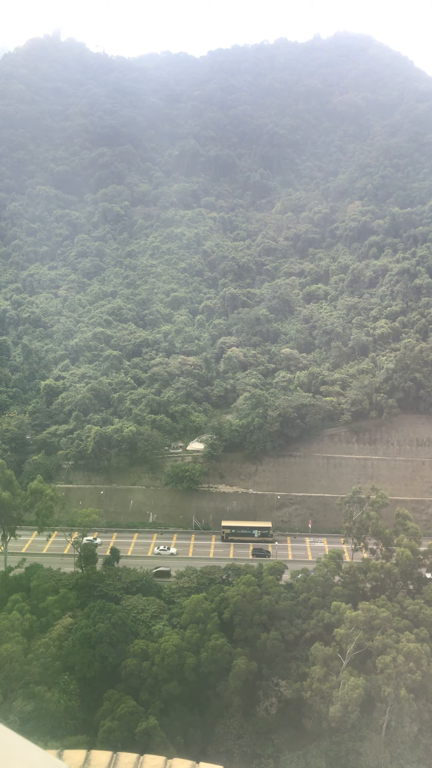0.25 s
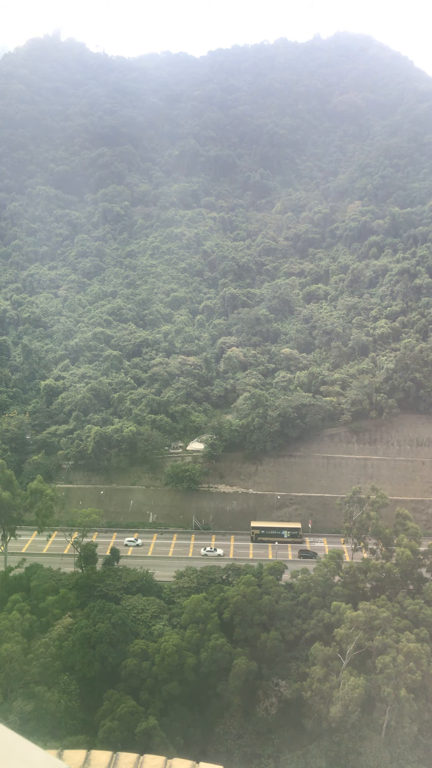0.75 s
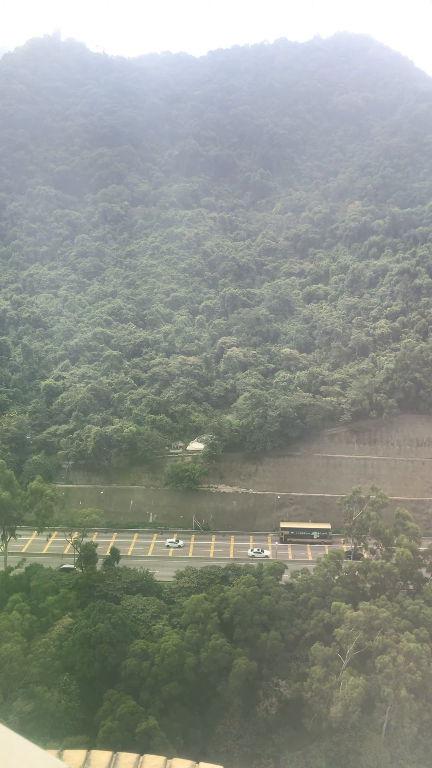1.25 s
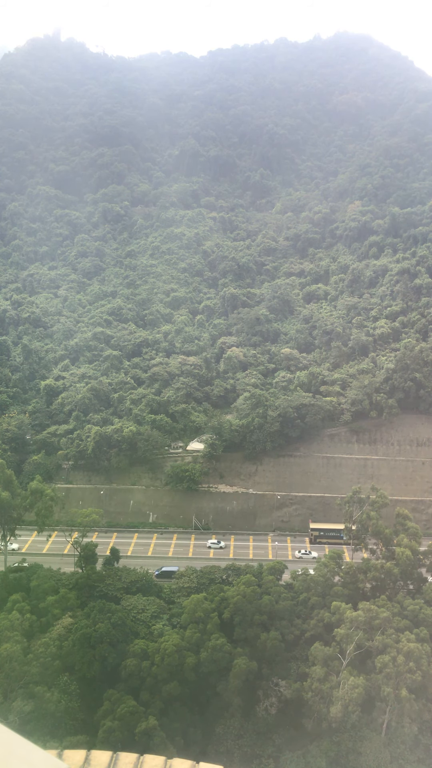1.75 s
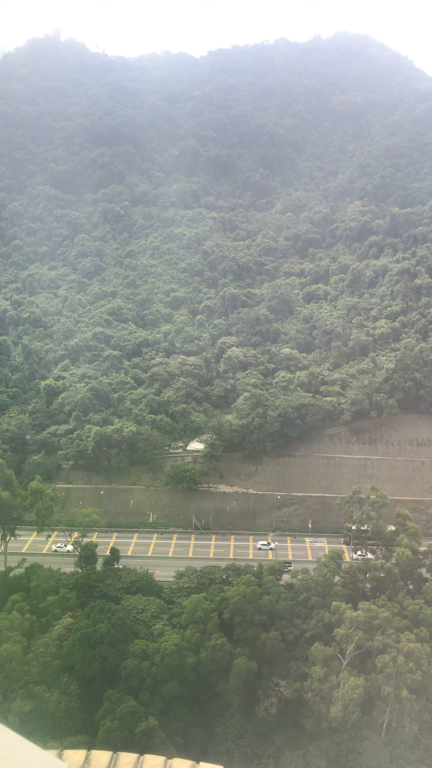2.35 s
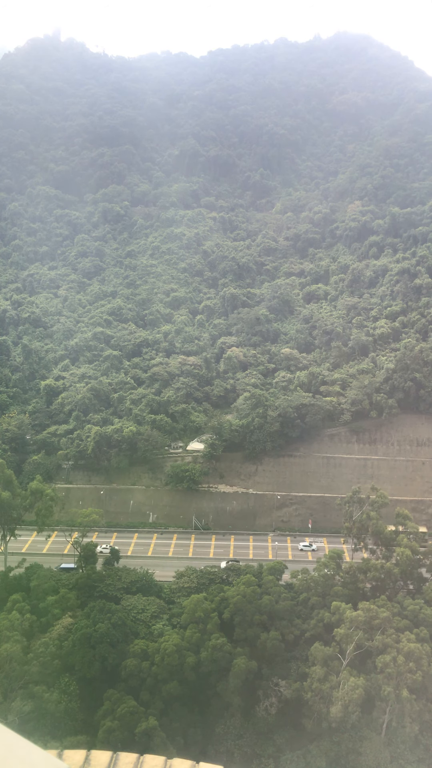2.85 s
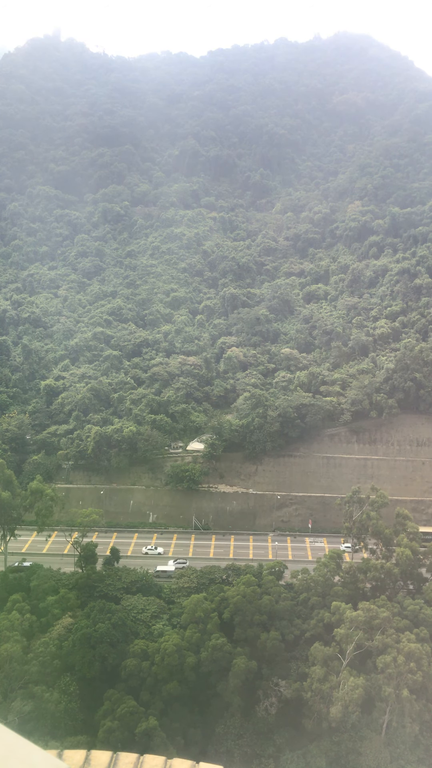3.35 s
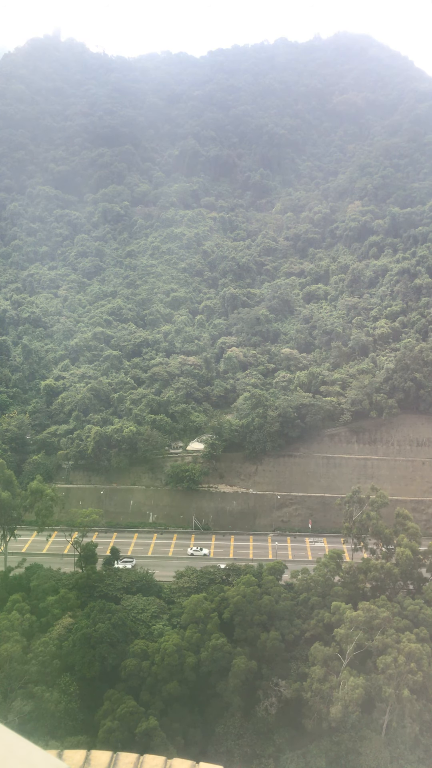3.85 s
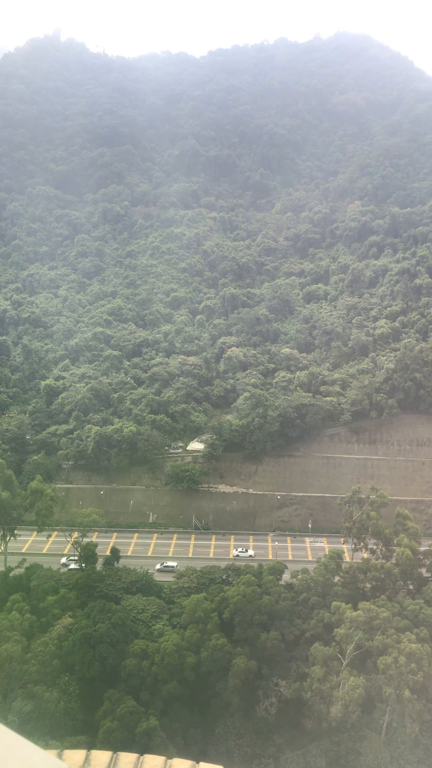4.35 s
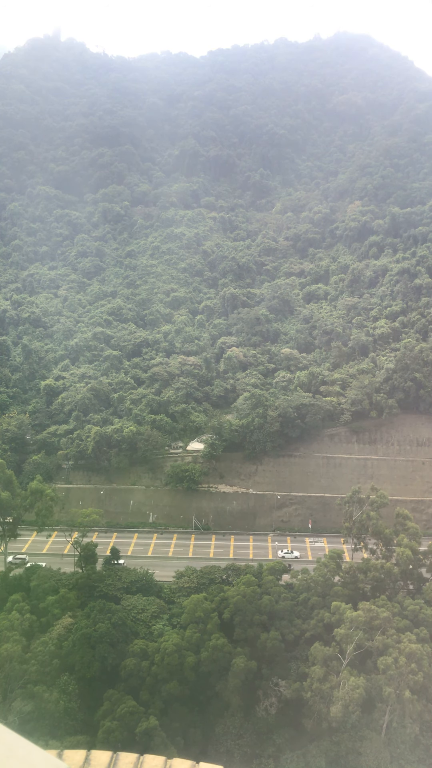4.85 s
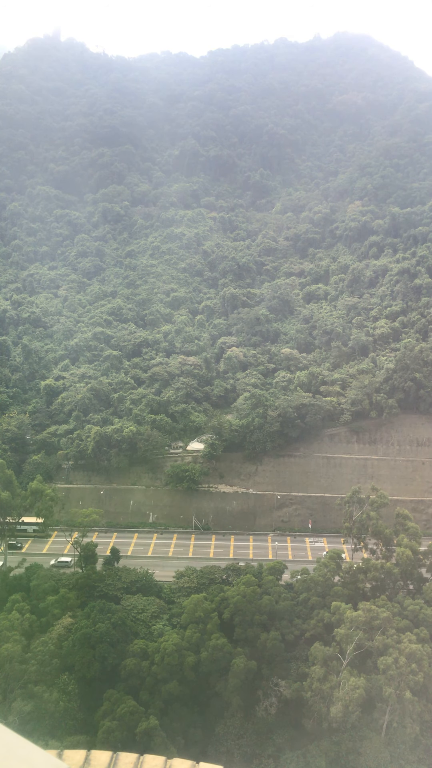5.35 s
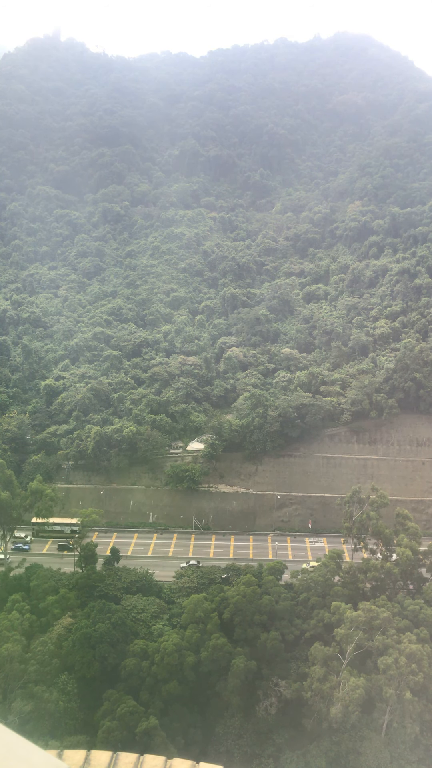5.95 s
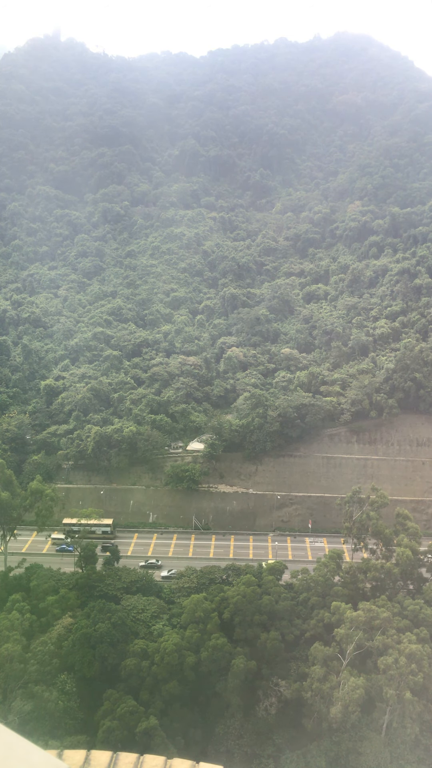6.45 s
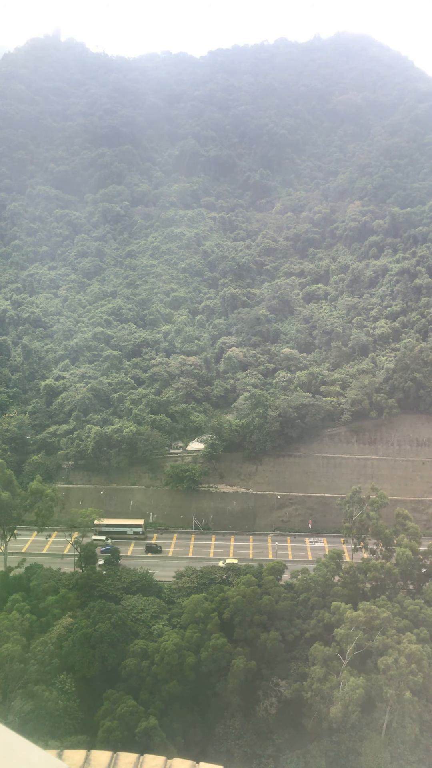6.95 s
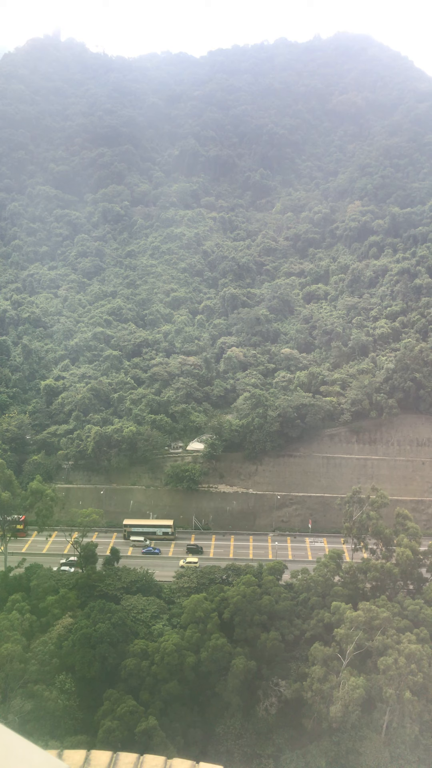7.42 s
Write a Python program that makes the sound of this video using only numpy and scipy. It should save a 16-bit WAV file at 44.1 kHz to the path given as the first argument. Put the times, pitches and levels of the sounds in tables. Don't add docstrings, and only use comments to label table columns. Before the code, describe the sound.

From a high room with an open window, a thin distant road roar and faint machine hum begin quietly as an engine drone dies away. Around two seconds vehicles swell into a throbbing low boom, with a sharp close click. The roar eases past four seconds, a tiny metal part tinks, then weaker swells follow with soft scuffs near the microphone and a last dull wooden knock.

```python
import sys
import numpy as np
from scipy import signal
from scipy.fft import rfft, irfft
from scipy.io import wavfile
from scipy.ndimage import uniform_filter1d

SR = 44100
rng = np.random.default_rng(int(sys.argv[2]) if len(sys.argv) > 2 else 0)


def ratio_of_db(decibels):
    return 10 ** (np.asarray(decibels, float) / 20)


def transcribe(u):
    v = np.clip(np.atleast_2d(u).T, -1, 1)
    q = np.round(v * 32767).astype(np.int16)
    wavfile.write(sys.argv[1], SR, q)


N = 338687


def evened(x):
    return x / np.sqrt(np.mean(x ** 2) + 1e-20)


def add(mix, start_s, sound):
    part = mix[round(start_s * SR):][:len(sound)]
    part += sound[:len(part)]


def read(points, hz):
    f, value = np.transpose(points)
    return np.interp(np.log(hz + 1), np.log(f + 1), value)


def follow(rows, t):
    s, *columns = np.transpose(rows)
    return [np.interp(t, s, c) for c in columns]


def bumps(peaks, hz):
    return sum(db * np.exp(-((hz - f) / width) ** 2) for f, width, db in peaks)


def surges(rows, t):
    return sum(ratio_of_db(2 * db) * np.exp(-2 * ((t - s) / half) ** 2) for s, db, half in rows)


def grid(size):
    return np.arange(4 * N // size + 5) * size / 4 / SR, np.fft.rfftfreq(size, 1 / SR)


def noise(gain, size):
    a, b = rng.standard_normal(gain.T.shape + (2,)).T
    spectra = (a + 1j * b) * gain
    return np.sqrt(1.5 * SR / size) * signal.istft(spectra, nperseg=size, noverlap=3 * size // 4)[1][:N]


def banded(tone_db, hz, bands, levels_db):
    centres = np.log([np.sqrt(lo * hi) for lo, hi in bands])
    field_db = tone_db[:, None]
    for (lo, hi), level_db, row in zip(bands, levels_db, np.eye(len(bands))):
        inside = (hz >= lo) & (hz < hi)
        own_db = 10 * np.log10(np.sum(ratio_of_db(tone_db[inside]) ** 2) * hz[1])
        share = np.interp(np.log(hz + 1), centres, row)
        field_db = field_db + np.outer(share, level_db - own_db)
    return ratio_of_db(field_db)


def mode(hz, width, loose, size=N):
    a, b = rng.standard_normal((size, 2)).T
    r = np.exp(-np.pi * width / SR)
    slow = signal.lfilter([1], [1, -r], signal.lfilter([1], [1, -r], a + 1j * b))
    slow = slow / abs(slow) ** (1 - np.clip(loose, 0, 1))
    carrier = np.exp(2j * np.pi * np.cumsum(hz * np.ones(size)) / SR)
    return evened((slow * carrier).real)


# freq_hz, density_db_per_hz
STILL_TONE = [(15, -46), (25, -14), (96, -8), (130, 2), (175, -11), (229, -6), (262, -9.5), (325, -9),
              (449, -24.5), (501, -8.5), (771, -20), (836, -24), (1040, -24.5), (1560, -37), (15900, -47)]


def still():
    t, hz = grid(size=2048)
    return ratio_of_db(-52) * evened(noise(np.outer(ratio_of_db(read(STILL_TONE, hz)), t ** 0), size=2048))


def drone(rows, width, loose):
    t = np.arange(N) / SR
    hz, db = follow(rows, t)
    return ratio_of_db(db - 60 * np.maximum(t - rows[-1][0], 0)) * mode(hz, width, loose)


# time_s, level_db
HUM_LOAD = [(0, -43), (.08, -45), (.35, -55), (1.4, -56.5), (1.9, -51), (2.65, -53), (2.85, -60),
            (3.8, -56), (4.2, -54.5), (4.8, -49), (5.2, -52), (6.2, -53), (6.6, -49), (6.9, -53),
            (7.25, -48.5), (7.68, -57)]
# time_s, pitch_hz, level_db
DEEP = [(0, 34.67, -58), (1.6, 34.46, -61), (2.4, 35, -48), (3.9, 35.5, -54), (4.3, 35, -54.5),
        (6.8, 35, -46.5), (7.2, 35, -60)]
# time_s, pitch_hz, level_db
IDLE = [(0.0, 71, -39), (0.104, 68.3, -43.5), (0.528, 69, -48), (0.66, 67.8, -55), (1.3, 68, -60)]


def hums():
    machine = drone([(s, 323.4, db + 0.5) for s, db in HUM_LOAD], width=0.6, loose=0.095)
    return machine + drone(DEEP, width=2.1, loose=0.33) + drone(IDLE, width=0.65, loose=0.18)


# middle_s, half_length_s, pitch_hz, level_db
MOANS = [(2.32, 0.19, 557, -53), (1.99, .1, 255, -48.5), (2.62, .06, 330, -46), (2.56, 0.046, 292, -45.5),
         (2.6, 0.12, 428, -48.5), (3.36, .13, 350, -46.5), (4.72, 0.13, 350, -50), (5.7, .12, 425, -59)]


def moans():
    out, t = np.zeros(N), np.arange(-SR // 2, SR // 2) / SR
    for s, half, hz, db in MOANS:
        swell = ratio_of_db(db) * np.exp(-(t / half) ** 2)
        add(out, s - 1 / 2, swell * mode(hz, width=3, loose=0.15, size=SR))
    return out


# strongest_s,
# rise_s, fall_s, high_hiss_db, low_hiss_re_high_db
SCUFFS = [(0.0, .01, 0.0043, -67, 8), (3.128, 0.079, .04, -69.5, 8.5), (3.366, .05, .015, -79.5, 14),
          (3.72, 0.014, 0.091, -68, 7), (3.834, .012, .05, -73, 8), (4.0, 0.14, 0.27, -76.5, 8.5),
          (4.776, 0.032, 0.054, -78.5, 15), (4.92, 0.082, 0.065, -64, 3.5), (5.25, .2, 0.064, -75.5, 7),
          (5.478, .035, 0.055, -62, 6), (6.2, 0.043, 0.12, -69, 2), (6.4, 0.048, 0.042, -62, 3.5),
          (6.58, .05, 0.092, -68, 5.5), (6.8, .12, .06, -74, 7), (7.186, .04, .04, -75, 5),
          (7.38, .07, 0.072, -71.5, 3)]


def scuffs():
    t, hz = grid(size=256)
    tone_db = read([(600, -19), (1500, 11), (6000, -2), (8000, -6), (8500, -10.5), (16000, -13.5)], hz)
    power = 0
    for s, rise, fall, db, low_db in SCUFFS:
        pressure = np.exp(-((t - s) / np.where(t < s, rise, fall)) ** 2)
        hiss = banded(tone_db, hz, [(2500, 7000), (8000, 15000)], [db + low_db, db])
        power = power + (pressure * hiss) ** 2
    slips = evened(uniform_filter1d(rng.exponential(1, N) - 1, size=12))
    grain = ratio_of_db(1.2 * rng.standard_normal(len(t)))
    return ratio_of_db(2.6 * slips - 2.6) * noise(np.sqrt(power) * grain, size=256)


# pitch_hz, level_db, t60_s
TINK = [(7900, -70, 0.17), (8900, -75, 0.087), (11020, -76, 0.087), (12700, -74, .12)]


def tink():
    out, t = np.zeros(N), np.arange(SR // 4) / SR
    for hz, db, t60 in TINK:
        add(out, 4.311, ratio_of_db(db - 60 * t / t60) * mode(hz, width=220, loose=0.8, size=len(t)))
    return out


# start_s, level_db, t60_s
KNOCK = [
    (7.608, -44.5, 0.23),
    (7.622, -47.5, .2),
    (7.629, -55, 0.21),
    (7.641, -63, 0.33),
]
# freq_hz, density_db_per_hz
KNOCK_TONE = [(260, -25), (520, 6.5), (700, -16), (950, -4), (1500, -4), (1980, -1), (2600, -11),
              (3300, -16), (4400, -21), (5000, -26), (8000, -36), (15400, -70)]


def knock():
    out, t, hz = np.zeros(N), np.arange(SR // 4) / SR, np.fft.rfftfreq(SR // 4, 1 / SR)
    for s, db, t60 in KNOCK:
        spectrum = rfft(rng.standard_normal(len(t))) * ratio_of_db(read(KNOCK_TONE, hz))
        ring = evened(irfft(spectrum, len(t)))
        attack = 1 - np.exp(-t / 0.00091)
        decay = ratio_of_db(db - 60 * t / t60) + ratio_of_db(db - 4) * np.exp(-t / 0.003)
        add(out, s, ring * attack * decay)
    return out


# start_s, peak_db, low_ring_re_peak_db, high_ring_re_peak_db, t60_s
CLICKS = [(1.8058, -54, -7, -16, 0.23), (2.0303, -34, -1, -22.5, 0.28), (2.873, -47.5, 6, -26, 0.14),
          (3.694, -45, -1.5, -24, 0.17), (3.825, -58, 8.5, -17, 0.11), (4.316, -63, -3, -11, 0.2),
          (5.8448, -64, -4, -17, 0.26), (6.0512, -46, -3, -18, 0.23), (6.334, -57, 12.5, -24, 0.33),
          (7.311, -67.5, 11.5, -24, .1)]
# freq_hz, width_hz, level_db
CLICK_BODY = [(1490, 670, 2), (2000, 160, -2.5), (3760, 340, -1.5), (4500, 220, 4.5), (5900, 300, 3),
              (7260, 370, 3)]


def clicks():
    out, t, hz = np.zeros(N), np.arange(SR // 2) / SR, np.fft.rfftfreq(SR // 2, 1 / SR)
    treble = 1 / (1 + (9000 / (hz + 1)) ** 4)
    for s, db, low_db, high_db, t60 in CLICKS:
        hold_s = 0.018 * 2 ** ((db + 35) / 20)
        tone = [(500, low_db - 20), (1000, low_db - 0.5), (2000, low_db - 0.5), (3200, low_db / 2 - 7),
                (4500, -12), (7500, -15), (12000, high_db - 3.5), (16000, high_db - 10)]
        clumps = evened(uniform_filter1d(rng.standard_normal(len(t)), size=24))
        echoes = rng.standard_normal(len(t)) * ratio_of_db(1.4 * clumps)
        ring = rfft(echoes) * ratio_of_db(read(tone, hz) + bumps(CLICK_BODY, hz))
        late = np.maximum(t - hold_s, 0) / t60
        tail = irfft(ring * (1 - treble)) * ratio_of_db(-60 * late)
        tail += irfft(ring * treble) * ratio_of_db(-85 * late) * (1 + 1.3 * np.exp(-t / 0.0022))
        tick = (1 - np.exp(-t / 0.00053)) * (1 + 0.37 * np.exp(-t / 0.0026))
        add(out, s, ratio_of_db(db + 6) * tail * tick)
    return out


# time_s, tyre_roar_db, engine_load_db
TRAFFIC = [(0.0, -65, -54.5), (1.0, -65.5, -54), (1.55, -66.5, -53), (1.8, -56, -48.5), (1.99, -52, -47),
           (2.69, -48.5, -44.5), (3.27, -49, -44), (3.47, -50.5, -45), (3.68, -56, -45.5),
           (4.17, -59.5, -52), (4.5, -57, -47.5), (4.95, -54, -44.5), (5.4, -55.5, -49), (6.05, -58, -50),
           (6.48, -54.5, -49), (6.84, -56, -49), (7.2, -63, -48.5), (7.68, -65.5, -52)]


def traffic(t):
    tyres_db, engines_db = follow(TRAFFIC, t)
    return tyres_db + 65, engines_db + 55


# time_s, pitch_hz
BOOM_HZ = [(0.0, 87), (1.8, 90), (3.2, 85), (4.6, 88), (7.68, 86)]
# pitch_hz, width_hz, unsteadiness_0_to_1, level_db
ROOM_MODES = [
    (45.73, 11, 0.1, -2),
    (118.5, 21, 0.67, -2.5),
    (63, 11, 0.9, -11),
]
# quiet_db, db_per_db_of_engine_load
MODES_FOLLOW = [
    (-61, 1.98),
    (-61, 1.5),
    (-61, 1.87),
    (-51, 2),
]
# middle_s, level_db, half_length_s
THROBS = [(1.26, -48, .04), (1.83, -45, 0.13), (2.08, -33.5, 0.065), (2.2, -40, .04), (2.33, -32.5, 0.037),
          (2.5, -35, 0.11), (2.64, -30.5, 0.05), (2.76, -29.5, 0.062), (2.93, -32, 0.098),
          (3.17, -30, 0.045), (3.34, -24, 0.027), (3.42, -23, 0.031), (3.51, -30.5, 0.022),
          (3.75, -36, 0.054), (3.85, -40, .04), (4.4, -48, .08), (4.56, -32.5, 0.035), (4.74, -40, .06),
          (4.85, -33.5, .04), (4.98, -33, 0.024), (5.32, -36.5, 0.026), (5.44, -38.5, .06),
          (5.62, -41, .05), (5.8, -43.5, .07), (6.06, -39, 0.074), (6.47, -38.5, .09), (6.64, -36.5, .05),
          (6.92, -36.5, .06), (7.14, -38.5, 0.05), (7.29, -42.5, 0.065)]
# middle_s, level_db
THUDS = [(1.45, -52), (1.84, -46), (1.94, -46), (2.24, -40), (2.41, -47), (2.63, -33.5), (2.7, -38),
         (2.92, -34), (3.1, -37), (3.17, -35), (3.4, -35.5), (3.51, -34), (3.73, -35.5), (3.9, -39.5),
         (4.12, -43.5), (4.56, -45), (4.79, -34), (4.92, -33), (5.04, -42), (5.21, -37.5), (5.38, -40),
         (5.5, -43), (5.68, -40), (5.92, -42), (6.07, -38), (6.4, -45), (6.66, -40.5), (6.82, -44),
         (7.14, -45), (7.53, -47)]


def boom():
    t, now = np.arange(0, N / SR + 0.01, 0.004), np.arange(N) / SR
    load_db = traffic(t)[1]
    thuds = surges([(s, db, 0.056) for s, db in THUDS], t)
    extra = (surges(THROBS, t), thuds, ratio_of_db(-9) * thuds, ratio_of_db(-18) * thuds)
    rings = [mode(follow(BOOM_HZ, now)[0], width=8.9, loose=0.33)]
    rings += [ratio_of_db(db) * mode(hz, width, loose) for hz, width, loose, db in ROOM_MODES]
    out = np.zeros(N)
    for (db, slope), more, ring in zip(MODES_FOLLOW, extra, rings):
        drive = np.sqrt(ratio_of_db(2 * (db + slope * load_db)) + more)
        out += np.interp(now, t, drive) * ring
    return out


# freq_hz, density_db_per_hz
ROAR_TONE = [(130, -0.5), (198, -9.5), (341, -9.5), (542, -13.5), (794, -18.5), (932, -16.5), (1160, -18),
             (1330, -14), (1640, -22.5), (3110, -34), (4600, -42.5), (6500, -43.5), (8000, -53),
             (8500, -57), (15900, -76)]
# quiet_db, share_of_tyre_swell, share_of_engine_swell
ROAR_FOLLOWS = [
    (-56, 0.011, 1),
    (-58.5, 0.43, 0.49),
    (-64.5, 0.98, 0.0092),
    (-71, 0.66, .05),
]
# time_s, level_db
LORRY_HISS = [(1.6, -1), (1.84, 3), (2.1, 0.7), (3.45, 0.5), (3.6, -0.1)]
# freq_hz, width_hz, level_db
ROOM_PEAKS = [(161, 7.7, 4.5), (199, 11, -5), (237, 2.3, 2.5), (351.6, 14, 5), (413, 7.3, -2.5),
              (426, 6, 3), (523, 14, 3), (564, 4.2, -4), (666.5, 5.6, 9.5), (794, 53, -6), (850, 7.7, 4.5),
              (903, 18, 0.5), (1260, 12, 3.5), (1702, 20, 1.5), (1840, 30, 2.5), (1920, 49, 1),
              (2040, 22, 1)]


def roar():
    t, hz = grid(size=1024)
    patches = rng.standard_normal((len(t), len(hz))).T
    patches = evened(uniform_filter1d(uniform_filter1d(patches, size=6, axis=0), size=14, axis=1))
    flutter = evened(uniform_filter1d(rng.standard_normal(len(t)), size=4))
    tyres_db, engines_db = traffic(t)
    parts_db = [db + a * tyres_db + b * engines_db for db, a, b in ROAR_FOLLOWS]
    parts_db[-1] = parts_db[-1] + follow(LORRY_HISS, t)[0]
    bands = [(145, 310), (340, 700), (800, 2000), (2500, 7000)]
    gain = banded(read(ROAR_TONE, hz), hz, bands, parts_db) * (hz > 130)[:, None]
    street = noise(gain * ratio_of_db(-1.5 + 1.24 * patches + 1.05 * flutter), size=1024)
    hz = np.fft.rfftfreq(N + 1, 1 / SR)
    ripple = evened(uniform_filter1d(rng.standard_normal(len(hz)), size=120))
    return irfft(rfft(street, N + 1) * ratio_of_db(bumps(ROOM_PEAKS, hz) + 1.8 * ripple), N + 1)[:N]


def scene():
    background = still() + hums() + moans()
    close = scuffs() + tink() + knock() + clicks()
    return (background + close + boom() + roar())[None]


def roll_off(x):
    return signal.sosfilt(signal.butter(12, 16020, fs=SR, output="sos"), x)


# freq_hz, width_hz, level_db
PORT_DIPS = [(4940, 210, -3.5), (10430, 460, -4)]


def record(dry):
    hz = np.fft.rfftfreq(N + 1, 1 / SR)
    band = (hz < 15800) / (1 + (30 / (hz + 1)) ** 8)
    heard = irfft(rfft(dry, N + 1) * ratio_of_db(bumps(PORT_DIPS, hz)) * band, N + 1)[:, :N]
    return roll_off(heard)


dry = scene()
out = record(dry)
transcribe(out)
```